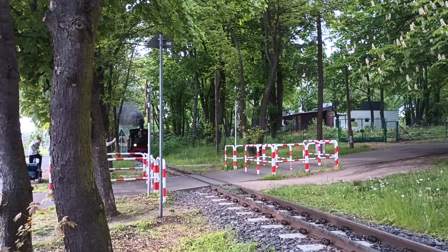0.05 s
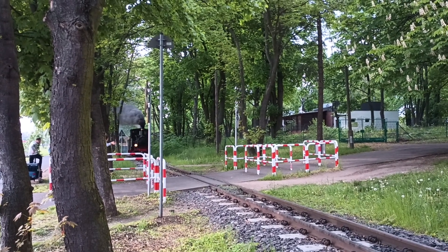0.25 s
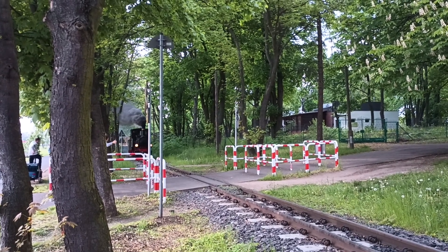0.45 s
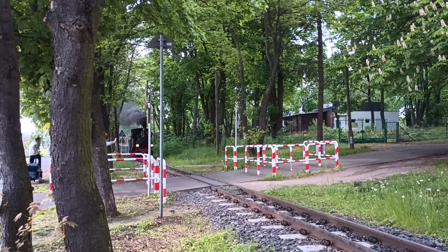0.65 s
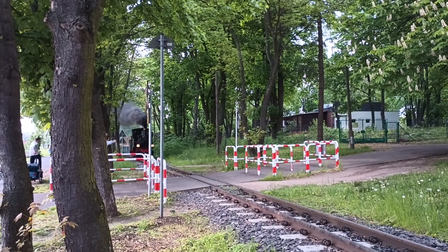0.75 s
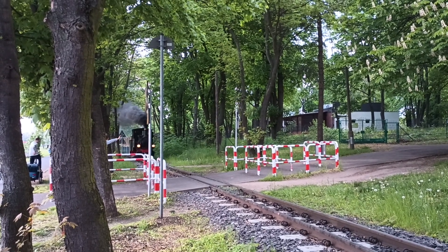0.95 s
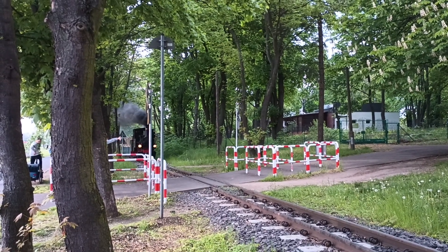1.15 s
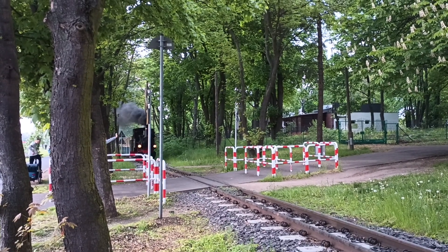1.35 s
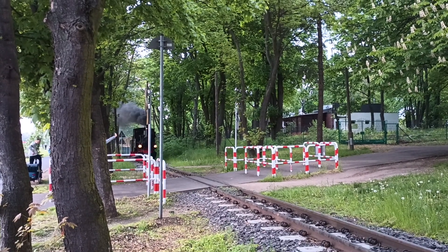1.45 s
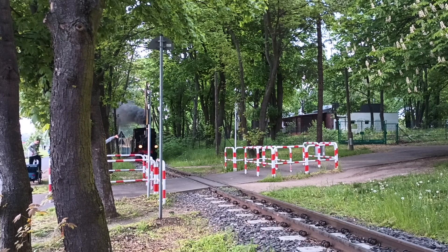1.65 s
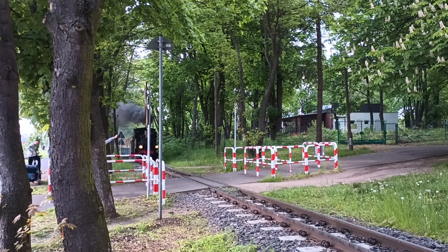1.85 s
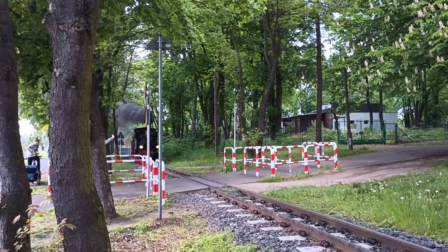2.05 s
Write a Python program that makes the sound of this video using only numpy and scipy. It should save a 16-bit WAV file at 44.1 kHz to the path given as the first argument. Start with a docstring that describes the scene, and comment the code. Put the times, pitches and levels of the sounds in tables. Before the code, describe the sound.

A small steam locomotive whistles among trees, one long hissing blast and then a short one.

```python
"""A small steam locomotive whistles among trees: a long blast sinking to a soft hoot, then a short one.
Steam blows the whistle's bell, which sharpens, overblows and hisses at full flow;
the trunks scatter the sound into a long tail.
The engine rumbles and chuffs below it, and birds give a few short pips."""
import sys
import numpy as np
from scipy import signal
from scipy.fft import rfft, irfft
from scipy.io import wavfile

SR = 44100
rng = np.random.default_rng(int(sys.argv[2]) if len(sys.argv) > 2 else 0)


def store_pcm(level_fs):
    """Save levels as 16-bit WAV."""
    pcm = np.round(np.clip(level_fs, -1, 1) * 32767).astype(np.int16)
    wavfile.write(sys.argv[1], SR, np.atleast_2d(pcm).T)


N = 92610
T = np.arange(N) / SR
RIGHT_LAG_S = .000105

# Steam at the whistle. Each row: time in seconds, bell pitch in Hz, flow in dB,
# jet treble in dB (only cuts apply).
STEAM_FLOW = [(.16, 652.3, -43, -11), (.21, 646.3, -11.5, -4), (.3, 645.9, -5.5, -5),
              (.44, 644.6, -2, -0.5), (.53, 661.7, 0, -0.5), (.65, 675.2, 0.5, -3), (.77, 671.9, 0, -2.5),
              (.86, 662.2, -3.5, -16.5), (.98, 660.4, -21.5, -1.5), (1.1, 656.6, -15.5, -6),
              (1.25, 647.6, -24.5, -7.5), (1.53, 628.5, -30.5, -8), (1.578, 665, -18, -1),
              (1.63, 670.6, -0.5, -2), (1.69, 672.4, 2.5, -4), (1.74, 659.2, -5, -8.5),
              (1.82, 649, -18.5, -2), (1.88, 643, -50, 4)]


def amp(db):
    """Decibels to amplitude."""
    return 10 ** (np.asarray(db) / 20)


def unit(x):
    """Scale to an RMS of one."""
    return x / np.sqrt(np.mean(x ** 2) + 1e-20)


def curve_at(points, hz):
    """Read a curve along a log-frequency axis."""
    f, value = np.transpose(points)
    return np.interp(np.log(hz + 1), np.log(f), value)


def follow(table):
    """Each column of a time table, sample by sample."""
    times, *columns = np.transpose(table)
    return [np.interp(T, times, column) for column in columns]


def wander(hz):
    """Random drift, mostly slower than the given rate."""
    f = np.fft.rfftfreq(N, 1 / SR)
    return unit(irfft(rfft(rng.standard_normal(N)) / (1 + (f / hz) ** 2), N))


def phase(hz):
    """Running phase of a moving pitch, in radians."""
    return 2 * np.pi * np.cumsum(hz) / SR


def breathy(hz, width_hz):
    """A resonance blown by turbulence: a narrow band of noise."""
    turn = phase(hz * np.ones(N))
    return unit(wander(width_hz / 2) * np.cos(turn) + wander(width_hz / 2) * np.sin(turn))


def noise(spectrum):
    """Coloured stereo noise, alike in the bass, wide in the treble and earlier on the left."""
    # Stereo image. Each row: frequency in Hz, left-right likeness from 0 to 1.
    likeness = [(130, 0.97), (300, 1), (700, 0.49), (1500, 0.35), (16000, 0.21)]
    f = np.fft.rfftfreq(N, 1 / SR)
    left, other = rfft(rng.standard_normal((2, N)))
    same = np.clip(curve_at(likeness, f), -1, 1)
    right = same * left * np.exp(-2j * np.pi * f * RIGHT_LAG_S) + np.sqrt(1 - same ** 2) * other
    return unit(irfft(np.array([left, right]) * amp(curve_at(spectrum, f)), N))


def pan(left_db):
    """Stereo gains that put the left this far above the right."""
    left_db = np.atleast_1d(left_db)
    return amp(np.array([left_db, -left_db]) / 2)


def arrive(x):
    """The sound reaches the left side first."""
    return np.array([x, np.interp(T - RIGHT_LAG_S, T, x)])


def wood_tail(x, build_s=0.011):
    """Scatter from the whole wood: builds up, then each band dies at its own speed."""
    # Reverberation. Each row: frequency in Hz, seconds to fall by 60 dB.
    decay_times = [(100, 1.1), (650, 2.36), (2000, 1.013), (3200, 0.91), (5500, 0.7), (8000, 0.39),
                   (16000, .3)]
    hz, t, bands = signal.stft(rng.standard_normal((2, SR)), SR, nperseg=256)
    t60 = curve_at(decay_times, hz)[:, None]
    envelope = amp(-60 * t / t60) * (1 - np.exp(-t / build_s))
    impulse = signal.istft(bands * envelope, SR, nperseg=256)[1]
    impulse /= np.sqrt(np.mean(abs(rfft(impulse, SR)[:, 500:4000]) ** 2))  # unit gain over 500-4000 Hz
    return signal.fftconvolve(np.atleast_2d(x), impulse, axes=1)[:, :N]


def trunks(x, energy_decay_s=0.021):
    """Early reflections from the nearest trunks, different on each side."""
    t = T[:SR // 8]
    impulse = rng.standard_normal((2, len(t))) * np.exp(-t / (2 * energy_decay_s))
    return signal.fftconvolve(x[None], impulse / np.linalg.norm(impulse[0]), axes=1)[:, :N]


def birds(upper_ratio=1.595, sag_hz_per_s=230):
    """Short two-note pips; the lower note rings on among the trees."""
    # Pips. Each row: start and length in seconds, pitch in Hz, lower and upper note levels in dB.
    pips = [(-.05, 0.12, 2747, -50, -59), (0.069, .065, 2730, -55.5, -64.5),
            (0.107, 0.051, 1474, -52.5, -81), (1.061, 0.063, 2730, -49, -62.5)]
    lower, upper = np.zeros((2, N))
    for start, length, hz, lower_db, upper_db in pips:
        turn = phase((hz - sag_hz_per_s * (T - start)) * (1 + 0.0083 * wander(80)))
        arch = np.sin(np.pi * np.clip((T - start) / length, 0, 1))
        lower += arch * amp(lower_db) * np.sin(turn)
        upper += arch * amp(upper_db) * np.sin(upper_ratio * turn)
    return lower + amp(5.0) * wood_tail(lower) + upper + trunks(upper)


def gear_and_leaves():
    """A soft bed of distant running gear and leaves."""
    # Background level: dips during the long blast, then comes back up. Each row: time in seconds, level in dB.
    levels = [(.4, -51.5), (.65, -57.5), (1.05, -53.5), (1.4, -49.5), (2.0, -53.5)]
    # Colour of the bed. Each row: frequency in Hz, relative level in dB.
    colour = [(25, -26.5), (80, -11), (110, 0.5), (170, -12.5), (280, -22), (420, -25.5), (510, -16),
              (850, -29.5), (1500, -17), (2200, -23), (3400, -32), (6000, -35), (16000, -56)]
    return amp(follow(levels)[0]) * noise(colour)


def chuffs(rise_s=0.045, decay_s=0.046):
    """Exhaust steam leaves the chimney in soft puffs."""
    # Exhaust beats. Each row: start in seconds, peak level in dB.
    beats = [(.08, -51.5), (1.1, -51), (1.22, -47.5), (1.551, -42), (1.725, -47.5), (1.9, -36)]
    # Colour of a puff. Each row: frequency in Hz, relative level in dB.
    colour = [(25, -36), (60, -9.5), (110, 2), (160, -4.5), (260, -19), (450, -22.5), (1000, -40.5),
              (1550, -22.5), (2500, -34), (8000, -67.5)]
    envelope = np.zeros(N)
    for start, db in beats:
        age = T - start
        envelope += amp(db) * np.clip(age / rise_s, 0, 1) * np.exp(-np.maximum(age - rise_s, 0) / decay_s)
    return noise(colour) * envelope


def engine_drone(hz=66, drift_hz=4.5):
    """The engine's rumble: one low, unsteady tone."""
    # Level of the drone. Each row: time in seconds, relative level in dB.
    levels = [(0.0, -52.5), (0.18, -50), (0.27, -46.5), (0.34, -56), (0.55, -47.5), (0.66, -67), (1.0, -60),
              (1.13, -54), (1.37, -66.5), (1.48, -42), (1.68, -59.5), (1.99, -44.5), (2.1, -48)]
    tone = np.sqrt(2) * np.sin(phase(hz + drift_hz * wander(21)))
    return arrive(tone * amp(follow(levels)[0] - 2.5))


def valve_seep(closing_db=-30.5):
    """Steam seeps past the valve in a thin, pitched hiss that fades as the valve seals."""
    # Resonances of the leak. Each row: pitch in Hz, width in Hz, level in dB.
    resonances = [(5420, 330, -69), (6600, 240, -74.5), (9000, 320, -82)]
    _, flow_db, _ = follow(STEAM_FLOW)
    opening = amp(np.minimum(flow_db - closing_db, 0))
    return opening * sum(amp(db) * np.array([breathy(hz, width), breathy(hz, width)])
                         for hz, width, db in resonances)


def steam_jet(flicker_db=.7, treble_hz=7200, echo_s=.14):
    """The jet hisses with the flow over a low roar; a duller echo returns from the edge of the wood."""
    # Colours of the hiss and the roar. Each row: frequency in Hz, relative level in dB.
    hiss_colour = [(100, -45), (400, -35.5), (560, -0.5), (1250, -7), (1700, 4), (2400, 0), (2900, -5),
                   (3700, 1), (6400, 3), (7300, -5.5), (8100, -10.5), (9100, -6.5), (11500, -17),
                   (13500, -26.5), (15000, -15.5), (16000, -17.5)]
    roar_colour = [(450, -35.5), (620, -13), (980, 1), (1200, -4), (2000, -32)]
    # Level of the roar. Each row: time in seconds, level in dB.
    roar_levels = [(.2, -70), (.3, -51), (.65, -44), (.85, -51), (1.53, -77.5), (1.58, -46.5), (1.72, -54),
                   (1.78, -89)]
    _, flow_db, treble_db = follow(STEAM_FLOW)
    hiss = noise(hiss_colour) * amp(-33.5 + flow_db + flicker_db * wander(13))
    dull = signal.sosfiltfilt(signal.butter(4, treble_hz, fs=SR, output="sos"), hiss)
    echo = np.array([np.interp(T - echo_s, T, side) for side in dull[::-1]])  # sides swapped
    hiss = dull + (hiss - dull) * amp(np.minimum(treble_db, 0))
    roar = noise(roar_colour) * amp(follow(roar_levels)[0])
    return hiss + roar + amp(-16.5) * echo + amp(-9) * wood_tail(hiss)


def bell_shriek(start_s=1.58, end_s=1.88, rise_s=.008, fall_s=.09, hz=3215, sag_hz_per_s=150):
    """The bell's high mode sings out in the short blast; returns the tone and its envelope."""
    envelope = np.clip((T - start_s) / rise_s, 0, 1) * np.exp(-np.maximum(T - end_s, 0) / fall_s)
    pitch = (hz - sag_hz_per_s * (T - start_s)) * (1 + 0.0061 * wander(74))
    return amp(-37.5) * envelope * np.sin(phase(pitch)), envelope


def bell_overtones(jitter=0.00507, duck_db=-4.5):
    """Upper modes of the bell: clean where it overblows, breathy where turbulence blows them."""
    # Clean overtones. Each row: time in seconds, relative dB of octave, twelfth and double octave.
    clean_levels = [(.2, -74, -69, -80), (0.234, -44.5, -51, -55.5), (0.3, -55, -33.5, -49.5),
                    (.41, -50.5, -30, -56), (.57, -50.5, -30, -51), (0.647, -46, -35.5, -39),
                    (0.667, -56, -18, -38), (.79, -35, -25.5, -41), (.87, -45.5, -29, -44),
                    (.98, -51.5, -38, -52), (1.11, -44, -44.5, -48), (1.15, -65.5, -47.5, -59.5),
                    (1.56, -80.5, -76.5, -88.5), (1.589, -62, -40, -61), (1.721, -52.5, -30, -47),
                    (1.78, -62, -33, -49), (1.84, -58, -47, -78), (1.89, -81, -36.5, -87),
                    (1.94, -80, -80, -80)]
    # Breathy modes. Each row: multiple of the pitch, relative dB at full flow,
    # dB gained per dB of flow, width in Hz.
    breathy_modes = [(2.99, -33, 1.3, 130), (2.84, -40.5, 1.56, 49)]
    hz, flow_db, _ = follow(STEAM_FLOW)
    turn = phase(hz * (1 + jitter * wander(71)))
    octave, twelfth, double_octave = (np.sqrt(2) * np.sin(multiple * turn) * amp(db)
                                      for multiple, db in zip((2, 3, 4.04), follow(clean_levels)))
    breath = sum(breathy(multiple * hz, width_hz) * amp(db + growth * flow_db)
                 for multiple, db, growth, width_hz in breathy_modes)
    high_mode = breathy(3230, width_hz=152.5) * amp(-32.5 + 2.5 * flow_db)
    shriek, shriek_envelope = bell_shriek()
    breath *= amp(duck_db * shriek_envelope)  # these modes give way while the high one sings
    odd = twelfth + breath + high_mode + shriek  # near three and five times the pitch
    even = octave + double_octave
    direct = arrive(odd + even) * pan(left_db=-0.5)
    early = amp(-6) * trunks(odd + even)
    late = wood_tail(amp(-5.5) * odd + amp(-16) * even)
    return amp(-1) * (direct + early + late)


def returning_note(turn, start_s=.458, end_s=.66, beat_hz=30.7):
    """The lower opening note comes back from the trees and beats against the risen pitch."""
    arch = np.sin(np.pi * np.clip((T - start_s) / (end_s - start_s), 0, 1))
    return -np.sin(turn - 2 * np.pi * beat_hz * (T - start_s)) * np.sqrt(2 * abs(arch))


def bell_hoot(jitter=0.0054, flutter=0.058):
    """The bell's nearly pure fundamental swells, fades and wanders between the trees."""
    # The hoot. Each row: time in seconds, pitch in Hz, relative level in dB, left over right in dB.
    contour = [(0.15, 636.3, -86, 6), (0.176, 640.5, -49, -1.0), (0.21, 644.0, -27.5, -2),
               (0.236, 645.5, -24, 2.5), (0.266, 652.5, -39, -13.5), (0.351, 642.9, -23, 2),
               (0.377, 638, -43.5, -2), (0.404, 642, -20.5, -1), (0.431, 638, -37.5, 7),
               (0.451, 657.3, -20, 3.5), (0.471, 670.0, -35, -4), (0.502, 670, -23.5, 0),
               (0.604, 674, -22, -2.5), (0.62, 674, -35.5, 8), (0.644, 672, -19.5, 3),
               (0.678, 675, -27.5, -2), (0.703, 686, -45, -3), (0.726, 667, -23.5, 3),
               (0.762, 665.7, -19, -2), (0.812, 661.2, -25, 7.5), (0.99, 661.2, -15.5, 0),
               (1.117, 654.3, -21, -2.0), (1.155, 647.2, -32, -4.5), (1.18, 649.7, -24, 7),
               (1.252, 651.7, -27, 1.5), (1.284, 650.7, -59, 10), (1.316, 636.2, -30.5, 11.5),
               (1.398, 632.7, -26, 2.5), (1.48, 632.8, -27.5, 2), (1.538, 632.4, -40, 19),
               (1.592, 666.3, -22, 1.5), (1.624, 666.2, -20, -1.5), (1.668, 679.5, -43.5, -1),
               (1.748, 649.9, -33, 8), (1.779, 650.3, -20, 9.5), (1.817, 645.1, -18, -1.5),
               (1.855, 644.6, -29, 10), (1.89, 653.5, -61, 15.5), (1.996, 642.2, -41.5, -2),
               (2.018, 643.2, -69.5, 10), (2.1, 659.0, -47.5, 7)]
    rounding = 0.29  # gliding on this power of the amplitude makes swells broad and dips narrow
    hz, rounded, left_db = follow([(s, pitch, amp(db - 0.7) ** rounding, side)
                                   for s, pitch, db, side in contour])
    level = rounded ** (1 / rounding)
    turn = phase(hz * (1 + jitter * wander(57)))
    tone = np.sqrt(2) * np.sin(turn) * level * (1 + flutter * wander(40))
    echo = returning_note(turn) * level * amp(-12)
    undertone = breathy(.85 * hz, width_hz=34) * level * amp(-31.5)
    return arrive(tone) * pan(left_db) + arrive(echo + undertone) + amp(-26.5) * wood_tail(tone)


def scene():
    """The whistle and its steam over the engine, the leaves and the birds."""
    whistle = bell_hoot() + bell_overtones() + steam_jet() + valve_seep()
    background = (engine_drone() + chuffs() + gear_and_leaves()) * pan(left_db=1.0)
    return whistle + background + birds()


def record(dry, cutoff_hz=15800):
    """A steep low-pass trims the very top."""
    lowpass = signal.firwin(511, cutoff_hz, window=("kaiser", 9), fs=SR)
    return signal.oaconvolve(dry, lowpass[None], "same")


dry = scene()
out = record(dry)
store_pcm(out)
```